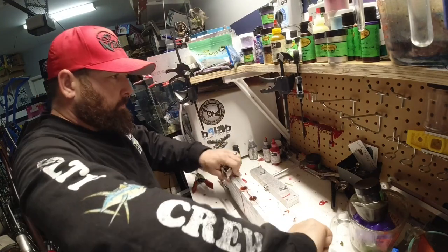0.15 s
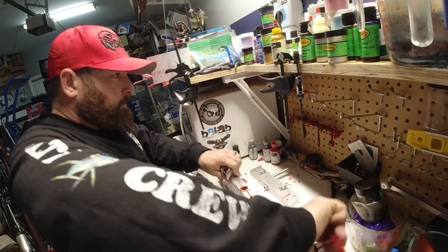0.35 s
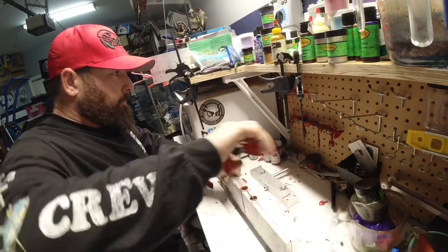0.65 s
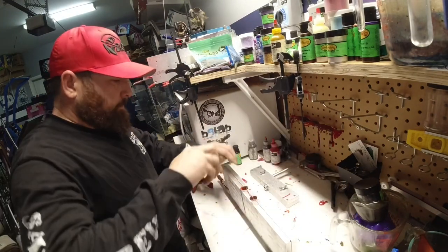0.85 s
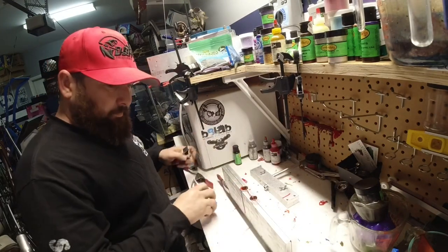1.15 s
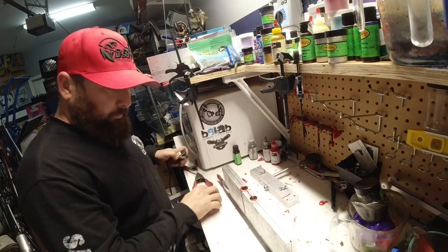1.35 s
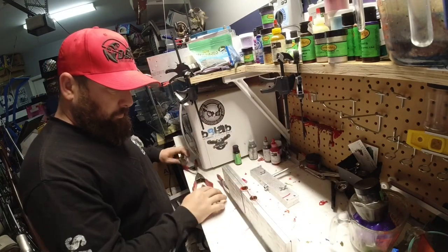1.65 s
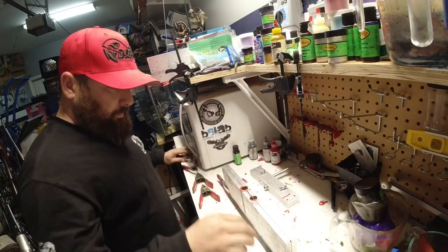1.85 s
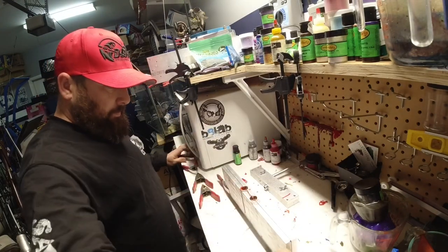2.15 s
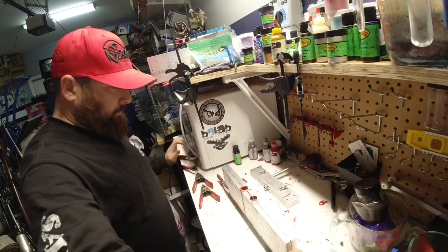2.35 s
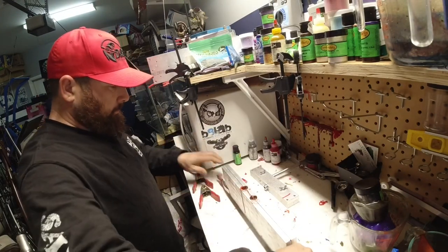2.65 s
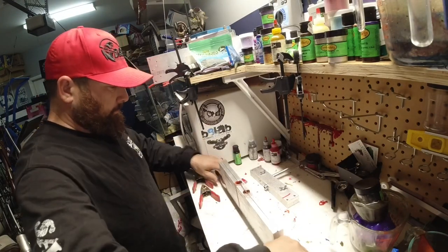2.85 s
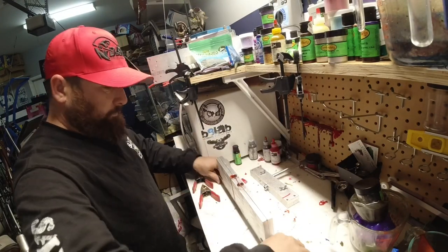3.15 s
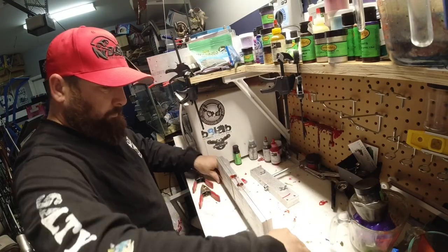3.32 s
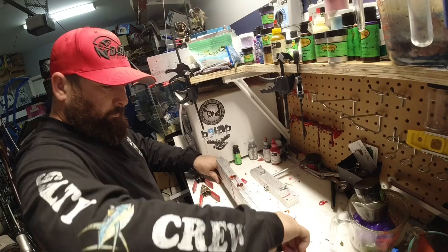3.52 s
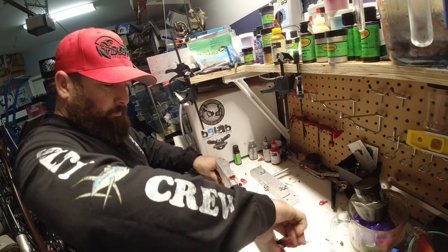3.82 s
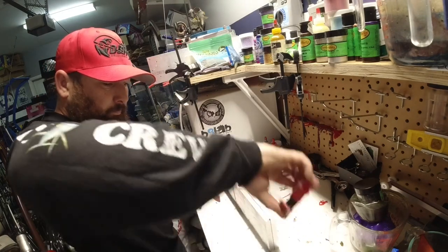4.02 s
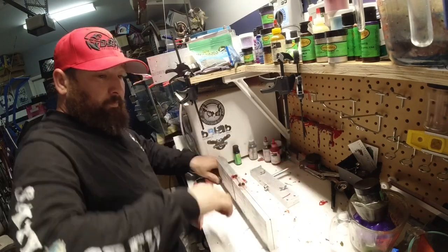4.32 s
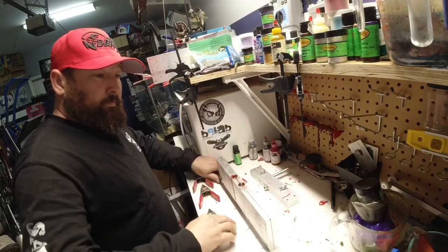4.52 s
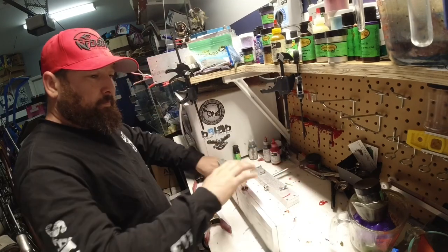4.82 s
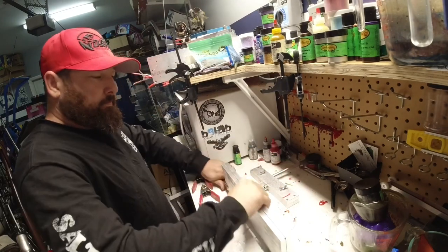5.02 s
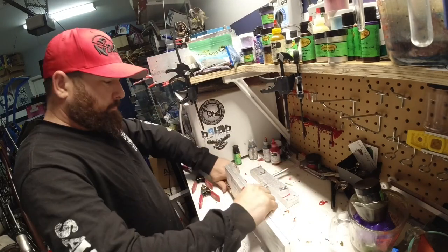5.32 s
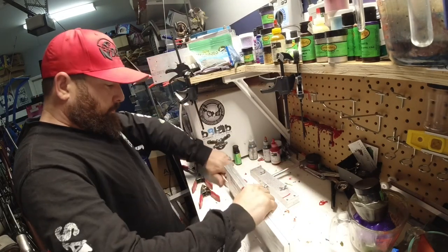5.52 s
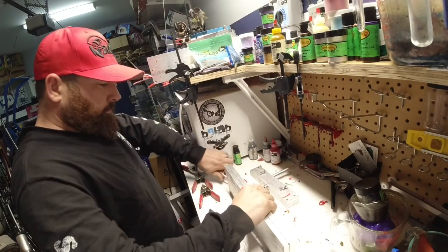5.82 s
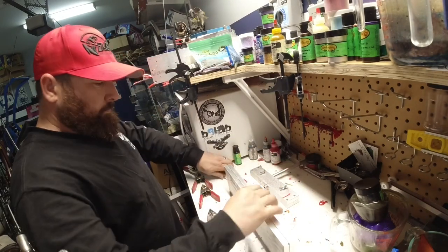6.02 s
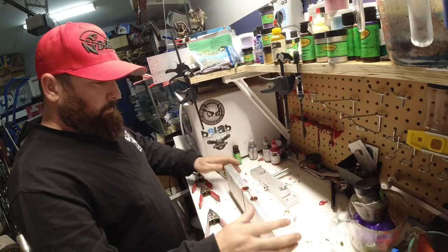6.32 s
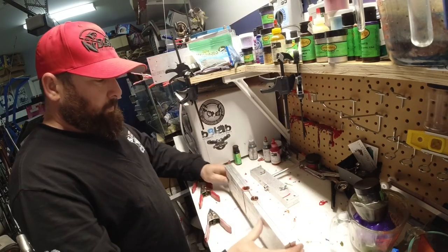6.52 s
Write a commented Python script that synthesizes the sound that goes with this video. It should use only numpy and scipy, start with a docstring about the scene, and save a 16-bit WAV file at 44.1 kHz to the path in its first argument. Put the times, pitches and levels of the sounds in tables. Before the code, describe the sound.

Irregular handling on a wooden workbench, heard very close: a quick flurry of metallic snaps, some duller taps, a brief lull, then a loud low slide. A hard, boomy knock with scraping follows, and later short rubs and bright, thin clicks. Deep frame rumble rises under the movements; the small garage gives a brief, dull tail over a quiet steady murmur.

```python
"""Cluttered garage, wooden workbench: spring clamps come off a metal mold and are set down;
the mold is slid, knocked and opened. Contacts are short metal clicks plus decaying bench modes.
Rubbing is shaped noise under stroke envelopes; ticks, squeaks and hums are narrow noise bursts.
Bench sound leads at the right of two close microphone ports, which the bench also carries.
A decaying-noise room answer, a deep frame rumble and a steady murmur complete it."""
import sys
import numpy as np
from scipy import signal
from scipy.fft import rfft, irfft, next_fast_len
from scipy.io import wavfile
from scipy.ndimage import uniform_filter1d, map_coordinates

SR = 44100
rng = np.random.default_rng(int(sys.argv[2]) if len(sys.argv) > 2 else 0)


def dump(signal):
    """Clip the signal to [-1, 1] and save it as 16-bit WAV at the path in sys.argv[1]."""
    limited = np.clip(np.atleast_2d(signal).T, -1, 1)
    pcm = np.round(limited * 32767).astype(np.int16)
    wavfile.write(sys.argv[1], SR, pcm)


N = 294147

# garage murmur spectrum: (frequency [Hz], relative density [dB])
AIR_SPECTRUM = [(20, 3.5), (123, -15.5), (450, -22), (2400, -34.5), (6000, -42.5), (10000, -72)]
# murmur left-right likeness: (frequency [Hz], correlation [-1..1])
AIR_LIKENESS = [(60, .93), (600, 0.59), (3000, .02)]
# left-right likeness of rubbing, sway and room: (frequency [Hz], correlation [-1..1])
BENCH_LIKENESS = [(200, 1), (800, 0.96), (3000, 0.76), (9000, 0.4)]
# bench frame swaying under the hands: (time [s], level [dB])
SWAY_LEVELS = [(0, -59.5), (0.5, -61), (1.2, -73.5), (1.78, -66), (2.2, -45.5), (2.45, -77), (2.75, -41.5),
               (3.2, -52), (3.35, -47), (4.0, -44), (4.3, -51.5), (4.5, -46.5), (4.65, -58.5),
               (5.08, -54.5), (5.6, -78), (6.15, -63.5), (6.67, -66)]
# frame rumble spectrum: (frequency [Hz], relative density [dB])
FRAME_SPECTRUM = [(15, -32), (40, -3), (100, -6), (135, 2), (200, -77.5)]
# room decay: (frequency [Hz], t60 [s])
GARAGE_T60 = [(100, 0.94), (600, 0.39), (1300, 0.22), (3000, 0.23), (12000, 0.13)]
# short metal ticks, narrow squeaks and low hums:
# (start [s], length [s], pitch [Hz], rms before the swell and fade [dB])
NARROW_BURSTS = [(0.166, 0.05, 3005, -44), (0.339, 0.082, 2095, -47.5), (0.364, .009, 2100, -39),
                 (0.469, 0.0054, 2060, -35), (0.495, 0.044, 382, -37.5), (0.963, 0.024, 1786, -61.5),
                 (2.305, .33, 2260, -78), (3.152, 0.066, 3150, -63.5), (3.153, 0.058, 4530, -69.5),
                 (3.331, 0.1, 1930, -65.5), (3.33, 0.065, 3980, -72), (3.41, .07, 4000, -84),
                 (3.53, 0.025, 2620, -45), (3.53, 0.03, 3880, -54), (4.984, 0.16, 112, -45.5),
                 (5.327, 0.077, 1454, -51.5), (5.327, .07, 1990, -54.5), (6.615, 0.026, 2380, -70.5)]
# bench top modes: (frequency [Hz], relative level [dB], t60 [s])
BENCH_MODES = [(105, 1, 0.27), (162.3, -1, 0.25), (239.2, 1, .19), (317, 0, 0.1), (381.3, 0, 0.072),
               (476, -10, 0.074), (650, -11, 0.16), (756, -12, 0.083), (818, -16, 0.026),
               (1012, -20.5, 0.036), (1290, -27, 0.045)]
# clamp metal modes: (frequency [Hz], width [Hz], relative level [dB]); chafing squares their response
CLAMP_MODES = [(1604, 240, 0.5), (2070, 550, 1), (2810, 900, 0), (4590, 630, -5)]
# scrape spectrum before resonance: (frequency [Hz], relative density [dB])
SCRAPE_SPECTRUM = [(350, -20), (650, -1), (1100, -7.5), (2500, -18.5), (5000, -25.5), (9000, -45.5)]
# rubbing hiss: (frequency [Hz], relative density [dB])
HISS_SPECTRUM = [(4000, -21), (6000, 2.5), (10500, -3.5), (13500, -17), (16000, -30)]
# things slid and pressed on the bench: (full pressure reached [s], rise [s], hold [s], fall [s],
# bench drone [dB], scrape on wood [dB], chafing of clamp metal [dB])
STROKE_EVENTS = [(0.157, 0.033, 0.026, 0.086, -46, -49, -57.5),
                 (0.318, 0.051, .015, 0.044, -74, -85.5, -60),
                 (0.405, 0.032, 0.0036, 0.029, -79, -56.5, -40.5),
                 (0.518, 0.036, 0.04, 0.078, -73.5, -48.5, -51),
                 (1.306, 0.0067, 0.036, 0.097, -67, -72.5, -61.5),
                 (1.802, 0.053, 0.083, 0.33, -61.5, -68, -71),
                 (2.053, 0.069, 0.033, 0.085, -79, -65.5, -63),
                 (2.122, 0.018, 0.0073, 0.27, -45.5, -63.5, -59),
                 (2.738, 0.065, 0.123, 0.13, -45, -49.5, -49.5),
                 (2.872, 0.14, 0.14, 0.054, -38.5, -46.5, -48), (2.92, 0.12, 0.021, .1, -27.5, -35.5, -57),
                 (3.182, 0.084, 0.06, 0.09, -60.5, -64, -67), (3.376, 0.39, 0.17, 0.14, -57, -84.5, -66.5),
                 (3.549, 0.047, 0.0055, 0.063, -70, -49.5, -74),
                 (3.616, 0.012, .004, 0.11, -48.5, -46, -58.5),
                 (3.833, 0.014, .012, 0.012, -42, -56.5, -41.5), (3.863, 0.014, 0.038, 0.13, -49, -39, -58),
                 (4.447, 0.019, 0.032, 0.057, -51, -54, -54.5), (4.756, 0.089, 0.13, 0.16, -46, -54.5, -65),
                 (4.972, 0.2, 0.16, 0.12, -49.5, -61, -66), (5.329, 0.03, 0.047, 0.21, -54.5, -52, -61.5),
                 (5.403, 0.023, 0.033, .05, -48, -41, -61.5),
                 (5.471, 0.071, 0.019, 0.037, -51.5, -40.5, -45.5),
                 (6.508, 0.021, 0.0085, 0.028, -52, -63.5, -60.5)]
# hands resting on the bench: (drone [dB], scrape [dB], chafing [dB])
RESTING_LEVELS = (-83, -92.5, -84.5)
# contacts: (time [s], click [dB], thump re click [dB], sizzle re click [dB],
# click pitch [Hz], hardness [dB per octave])
CONTACT_EVENTS = [(0.1567, -25.5, -9.5, -53, 1765, -12.5), (0.286, -48, -7, -43, 2300, 6),
                  (0.3078, -40.5, -9.5, -53.5, 1780, -7), (0.379, -35, -19.5, -26, 1970, -7.5),
                  (0.4, -19.5, -15.5, -20.5, 2220, 5), (0.488, -19.5, -5.5, -22.5, 2840, 22.5),
                  (0.528, -45, -13, -18, 2460, -5.5), (0.548, -33.5, -30, -17, 3430, -2),
                  (0.564, -32, -15, -18, 3700, 11.5), (0.5753, -33.5, -8, -11.5, 3100, -23),
                  (1.306, -52, 2, -55, 1580, -18), (1.5117, -29.5, -4.5, -57, 1177, 2.5),
                  (1.5642, -28, 2.5, -67, 1493, 1.5), (1.588, -42, -2, -49, 2920, 0),
                  (1.81, -41.5, 18, -66, 1410, 0), (1.953, -37.5, 5.5, -52, 2480, 3),
                  (1.9704, -28.5, 3, -42, 2144, 0.5), (2.1251, -38.5, 4.5, -53, 1840, -8),
                  (2.17, -36, 13, -52, 1045, -0.5), (2.239, -33.5, 3.5, -57, 1955, -2.5),
                  (3.233, -50, -4.5, -42, 3190, 5.5), (3.452, -46, 3, -54, 1850, 7.5),
                  (3.474, -47.5, 5.5, -50, 2680, 3.5), (3.533, -36, -5, -57, 2002, -2.5),
                  (3.631, -32, 16.5, -30.5, 1455, -7), (3.865, -18.5, 15, -25.5, 1498, 1),
                  (3.952, -24, -19, -11, 1886, 16), (4.4459, -28, -11.5, -8, 2440, 6.5),
                  (4.478, -40, 7, -11, 2570, 4.5), (5.2994, -63, 22, -35, 1720, -8),
                  (5.4165, -35, -6, -37, 1500, 0), (5.6168, -41.5, -26.5, 4, 2294, 6.5),
                  (5.6371, -23.5, -19.5, 2, 2770, 12), (5.657, -25.5, -38.5, 5, 1703, 6.5),
                  (6.035, -28, 9, -16, 2102, 4), (6.0418, -22, 6, -14.5, 1905, 3),
                  (6.074, -35, 4.5, -14, 2920, 7), (6.5004, -40.5, -6.5, -12, 2585, 21)]

AIR_DB = -66
RAMP_DB = 20  # level change over one rise or fall time
HISS_DB, HISS_REF_EFFORT_DB, HISS_DB_PER_EFFORT_DB = -59.5, -46.5, 1.9
SCRAPE_EFFORT_WEIGHT_DB = -8.5
# a louder click is shorter: dB of t60 lost per dB over the usual level
CLICK_T60_S, USUAL_CLICK_DB, T60_DB_PER_CLICK_DB = 0.059, -26.5, 0.11
LEFT_LAG_S = .0000644
TOP_HZ = 16100


def amp(db):
    """dB to gain."""
    return 10 ** (np.asarray(db) / 20)


def unit(x):
    """Scale to rms 1."""
    return x / np.sqrt(np.mean(x ** 2) + 1e-20)


def peaked(x):
    """Scale to peak 1."""
    return x / np.abs(x).max()


def along(points, hz):
    """Interpolate (frequency [Hz], value) points on a log axis."""
    point_hz, values = np.transpose(points)
    return np.interp(np.log(hz + 1), np.log(point_hz + 1), values)


def spectrum(points):
    """Gain function of frequency from (frequency [Hz], level [dB]) points."""
    return lambda hz: amp(along(points, hz))


def wobble(rate_hz):
    """Smooth random curve with rate_hz knots per second."""
    knots = rng.standard_normal(int(N * rate_hz / SR) + 4)
    return map_coordinates(knots, [np.arange(N) * rate_hz / SR])


def filtered(x, response):
    """Apply a complex response of frequency."""
    size = next_fast_len(N + SR // 2)
    return irfft(rfft(x, size) * response(np.fft.rfftfreq(size, 1 / SR)), size)[..., :N]


def bandpass(x, low_hz, high_hz, order):
    """Butterworth band-pass."""
    return signal.sosfilt(signal.butter(order, [low_hz, high_hz], "band", fs=SR, output="sos"), x)


def resonances(modes):
    """Summed response of (frequency [Hz], width [Hz], level [dB]) modes, alternating in sign."""
    def response(hz):
        total = 0
        for k, (mode_hz, width_hz, db) in enumerate(modes):
            damping = 1j * hz * width_hz
            total = total + (-1) ** k * amp(db) * damping / (mode_hz ** 2 - hz ** 2 + damping)
        return total
    return response


def mixing_angle(likeness, hz):
    """Half-angle giving two independent noises the wanted left-right correlation."""
    return np.arccos(np.clip(along(likeness, hz), -1, 1)) / 2


def rush(gain, likeness, lumps, lump_rate_hz, patchy_db=0):
    """Stereo noise of rms 1, uneven by random lumps and patches of shifting colour."""
    _, _, z = signal.stft(rng.standard_normal((2, N)), nperseg=512)
    patches = uniform_filter1d(rng.standard_normal(z.shape[1:]), size=2, axis=0)
    patches = uniform_filter1d(patches, size=14, axis=1)
    pair = signal.istft(z * amp(patchy_db * unit(patches)), nperseg=512)[1][:, :N]
    pair = pair * np.exp(lumps * wobble(lump_rate_hz))

    def mid_side_gain(hz):
        angle = mixing_angle(likeness, hz)
        return gain(hz) * np.array([np.cos(angle), np.sin(angle)])
    mid, side = filtered(pair, mid_side_gain)
    return unit(np.array([mid + side, mid - side]))


def air():
    """Steady garage murmur: shaped noise, nearly mono in the bass."""
    return amp(AIR_DB) * rush(spectrum(AIR_SPECTRUM), AIR_LIKENESS, lumps=0.056, lump_rate_hz=6.8)


def sway():
    """Deep rumble reaching the microphones through the bench frame."""
    time_s, level_db = np.transpose(SWAY_LEVELS)
    gain = amp(np.interp(np.arange(N) / SR, time_s, level_db))
    return gain * rush(spectrum(FRAME_SPECTRUM), BENCH_LIKENESS, lumps=0.5, lump_rate_hz=8.4)


def garage(x):
    """Room answer: noise whose frequencies decay at their own speeds, bass alike at both ports."""
    hz, t, z = signal.stft(rng.standard_normal((2, SR * 3 // 4)), SR, nperseg=256)
    angle = mixing_angle(BENCH_LIKENESS, hz)[:, None]
    mid, side = z[0] * np.cos(angle), z[1] * np.sin(angle)
    fade = amp(-60 * t / along(GARAGE_T60, hz)[:, None])
    tail = signal.istft(np.array([mid + side, mid - side]) * fade, SR, nperseg=256)[1]
    tail = tail / np.linalg.norm(tail[0])
    delayed = np.pad(x, (200, 0))  # samples before the first answer
    return signal.fftconvolve(delayed[None], tail, axes=1)[:, :N]


def pressure():
    """Drone, scrape and chafing levels [dB]: strokes rise, hold and fall, adding in power."""
    t, power = np.arange(N) / SR, amp(RESTING_LEVELS)[:, None] ** 2
    for start_s, rise_s, hold_s, fall_s, *levels_db in STROKE_EVENTS:
        before = (start_s - t) / max(rise_s, .005)
        after = (t - start_s - hold_s) / max(fall_s, .005)
        away = np.maximum(before, after).clip(0)
        power = power + amp(levels_db)[:, None] ** 2 * amp(-RAMP_DB * away) ** 2
    return 10 * np.log10(power)


def sliding():
    """Rubbing drives bench modes, scrapes wood, chafes the clamp and adds hiss."""
    drone_db, scrape_db, chafe_db = pressure()
    top = resonances([(hz, 15 + 0.11 * hz, db) for hz, db, _ in BENCH_MODES[1:]])
    wood = [(hz, 0.089 * hz, 0) for hz, _, _ in BENCH_MODES]
    metal = [(hz, 0.26 * width_hz, 0) for hz, width_hz, _ in CLAMP_MODES]
    grain, clamp = resonances(wood + metal), resonances(CLAMP_MODES)

    def scrape_gain(hz):
        return spectrum(SCRAPE_SPECTRUM)(hz) * (1 + np.abs(grain(hz)))

    def chafe_gain(hz):
        return clamp(hz) ** 2

    drone = amp(drone_db) * rush(top, BENCH_LIKENESS, lumps=0.29, lump_rate_hz=83)
    scrape = amp(scrape_db) * rush(
        scrape_gain, BENCH_LIKENESS, lumps=0.25, lump_rate_hz=60, patchy_db=4.5)
    chafe = amp(chafe_db) * rush(
        chafe_gain, BENCH_LIKENESS, lumps=0.37, lump_rate_hz=220, patchy_db=3.0)
    # hiss level follows scrape and chafing, rising faster than they do
    effort = amp(2 * (scrape_db + SCRAPE_EFFORT_WEIGHT_DB)) + amp(2 * chafe_db)
    effort_db = 10 * np.log10(effort)
    hiss_db = HISS_DB + HISS_DB_PER_EFFORT_DB * (effort_db - HISS_REF_EFFORT_DB)
    hiss = amp(hiss_db) * rush(
        spectrum(HISS_SPECTRUM), BENCH_LIKENESS, lumps=0.2, lump_rate_hz=130)
    return drone + scrape + chafe + hiss


def narrow_bursts():
    """Ticks, squeaks and hums: uneven noise bursts through one narrow mode each."""
    out, uneven = np.zeros(N), np.exp(0.3 * wobble(150))
    for start_s, length_s, hz, db in NARROW_BURSTS:
        start = round(start_s * SR)
        t = np.arange(round(length_s * SR)) / SR
        half_width_hz = min(0.043 * hz + 1.5 / length_s, hz / 4)  # the longer, the purer
        noise = rng.standard_normal(len(t)) * uneven[start:][:len(t)]
        tone = bandpass(noise, hz - half_width_hz, hz + half_width_hz, order=2)
        swell = np.sqrt(np.sin(np.pi * t / length_s))
        out[start:][:len(t)] += amp(db) * unit(tone) * swell
    return out


def click(t, t60_s, hz, sizzle_db):
    """Stereo metal click: narrow ring with random modes, broad crack, high edge sizzle."""
    noise = rng.standard_normal((5, len(t)))
    attack = 1 - np.exp(-t / 0.00058)
    fade = attack * amp(-60 * t / max(t60_s, .004)) * (1 + 2.1 * amp(-60 * t / 0.0043))
    modes_hz = hz * np.exp(.25 * rng.standard_normal((12, 1)))
    partials = .3 * np.sin(2 * np.pi * modes_hz * t).sum(axis=0)
    ring = bandpass((noise[0] + partials) * fade, 700, 5200, order=4)
    ring = bandpass(ring, 0.79 * hz, 1.545 * hz, order=2)
    # short waves scatter off the clutter: each port gets partly its own noise
    crack = bandpass((noise[1] + 0.76 * noise[3:]) * fade, 700, 5200, order=4)
    sizzle = bandpass((noise[2] + 0.5 * noise[3:]) * fade, 5600, 11500, order=4)
    return peaked(peaked(ring) + 0.65 * peaked(crack)) + amp(sizzle_db) * peaked(sizzle)


def thump(t, hard_db):
    """Bench modes struck together; a hard blow favours the high ones."""
    chance = rng.standard_normal((len(BENCH_MODES), 3))
    # each mode's phase wanders at random, so the ring blurs
    walk = rng.standard_normal((len(BENCH_MODES), len(t))).cumsum(axis=1)
    drift = 6 * uniform_filter1d(walk, size=300, axis=1) / np.sqrt(SR)
    drift -= drift[:, :1]
    total = np.zeros(len(t))
    for (hz, db, t60_s), (u, v, w), slip in zip(BENCH_MODES, chance, drift):
        level_db = db + 2 * u + hard_db * np.log2(hz / 300) - 60 * t / t60_s
        detuned_hz = hz * (1 + 0.017 * v)  # slightly, at random for each blow
        build = 1 - np.exp(-t * hz / 0.87)  # takes a cycle or so
        total -= amp(level_db) * np.sin(2 * np.pi * detuned_hz * t + .5 * w + slip) * build
    # the first swing is heard directly, before the blow spreads through the top
    return peaked(total * (1 + 5.2 * amp(-60 * t / 0.036)))


def contacts():
    """Each contact clicks in the metal and thumps the bench top."""
    clicks, thumps = np.zeros((2, N + SR)), np.zeros(N + SR)
    t = np.arange(SR // 3) / SR
    short_t = t[:SR // 8]
    for start_s, db, thump_db, sizzle_db, hz, hard_db in CONTACT_EVENTS:
        start = round(start_s * SR)
        t60_s = CLICK_T60_S * amp(T60_DB_PER_CLICK_DB * (USUAL_CLICK_DB - db))
        clicks[:, start:][:, :len(short_t)] += amp(db) * click(short_t, t60_s, hz, sizzle_db)
        thumps[start:][:len(t)] += amp(db + thump_db) * thump(t, hard_db)
    # the thumps have little deep bass below about 80 Hz
    bass_cut = signal.butter(2, 80, "high", fs=SR, output="sos")
    return clicks[:, :N], signal.sosfilt(bass_cut, thumps[:N])


def scene():
    """Bench and room answer reach the right port first; sway and murmur are added unlagged."""
    clicks, thumps = contacts()
    metal = clicks + narrow_bursts()
    room = amp(-11.5) * garage(metal[0]) + amp(-12) * garage(thumps)
    bench = metal + thumps + sliding() + room

    def port_lag(hz):
        # half the lag late at left, half early at right
        return np.exp(-1j * np.pi * hz * LEFT_LAG_S * np.array([[1], [-1]]))
    return filtered(bench, port_lag) + sway() + air()


def record(dry):
    """Brick-wall low-pass at TOP_HZ."""
    return filtered(dry, lambda hz: hz < TOP_HZ)


dry = scene()
out = record(dry)
dump(out)
```